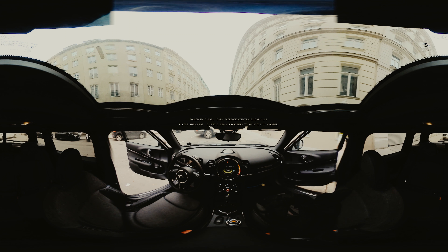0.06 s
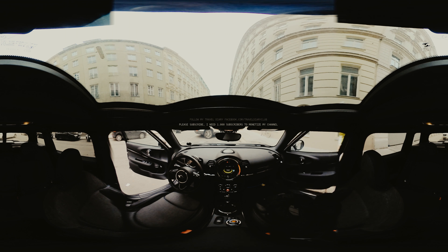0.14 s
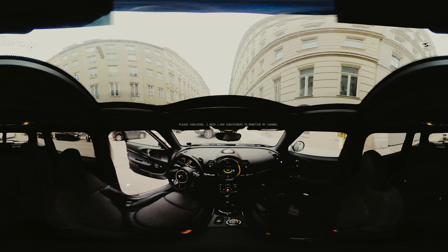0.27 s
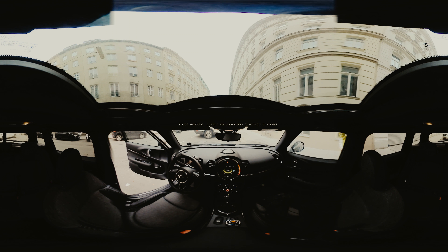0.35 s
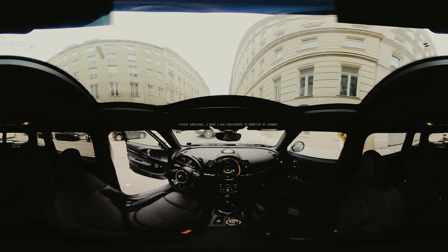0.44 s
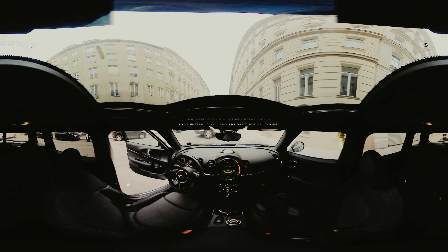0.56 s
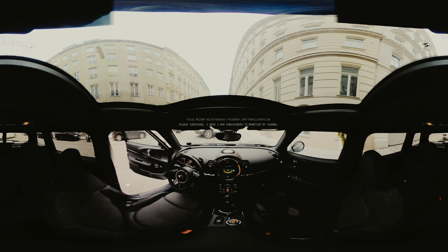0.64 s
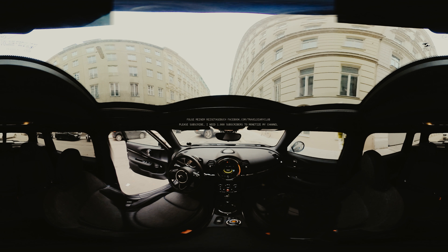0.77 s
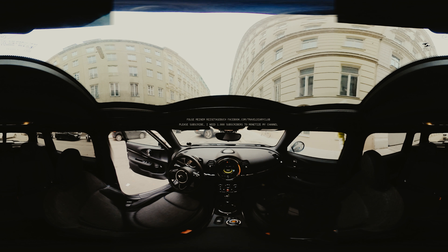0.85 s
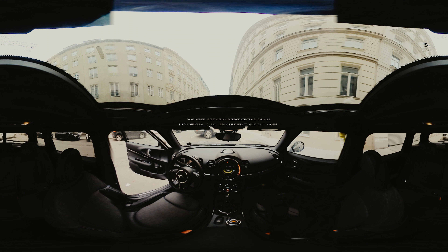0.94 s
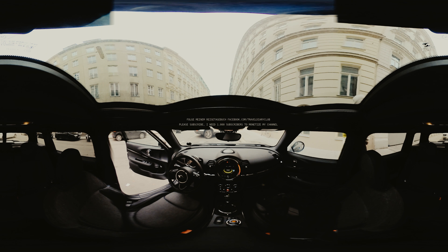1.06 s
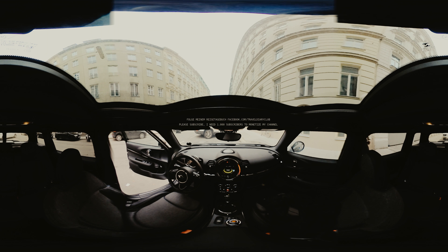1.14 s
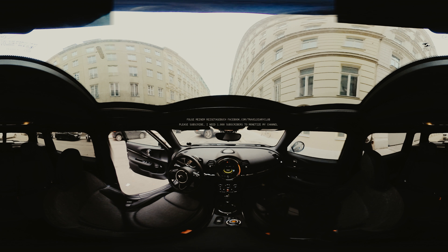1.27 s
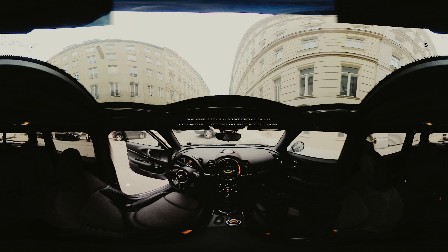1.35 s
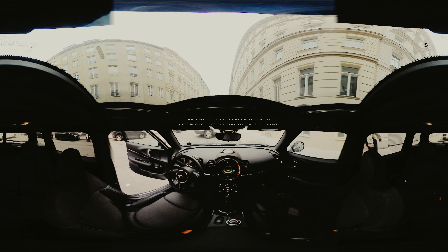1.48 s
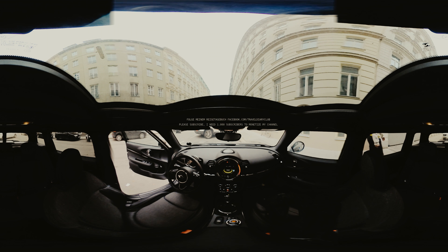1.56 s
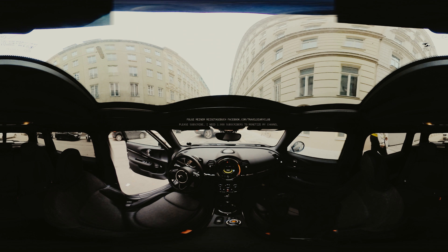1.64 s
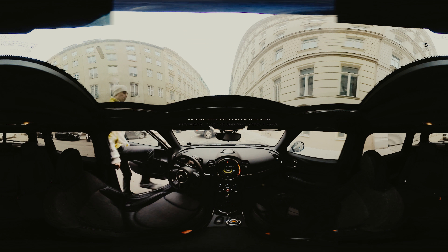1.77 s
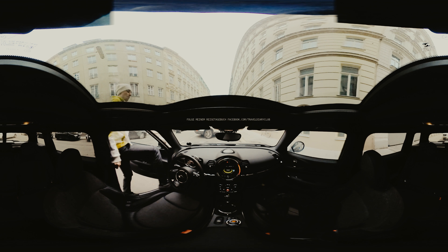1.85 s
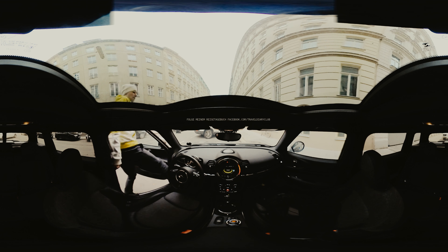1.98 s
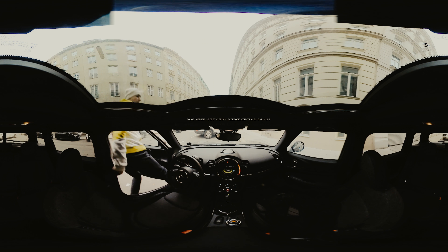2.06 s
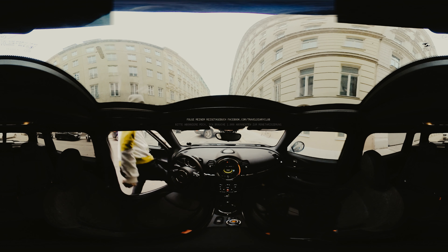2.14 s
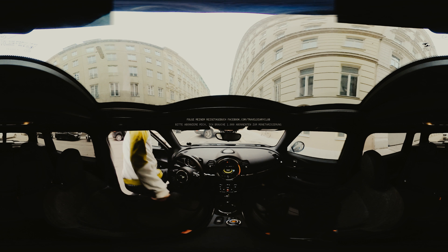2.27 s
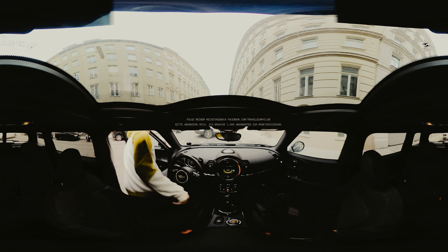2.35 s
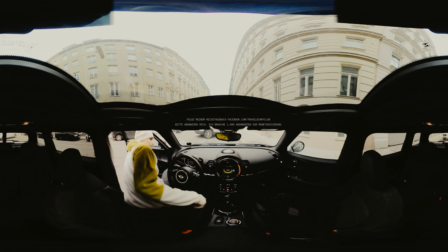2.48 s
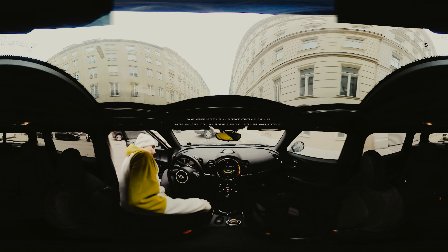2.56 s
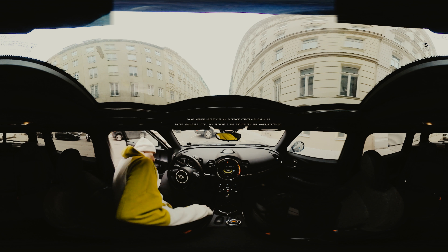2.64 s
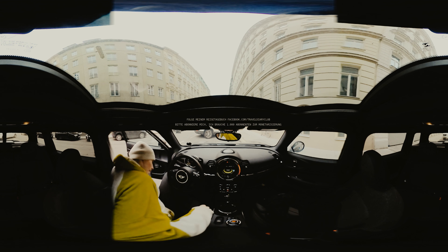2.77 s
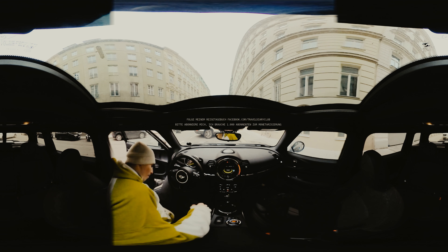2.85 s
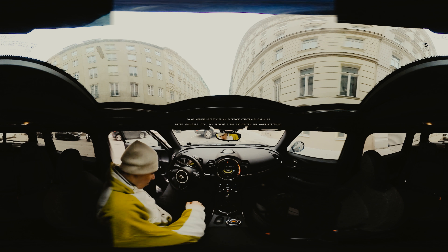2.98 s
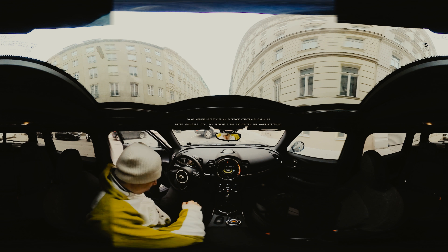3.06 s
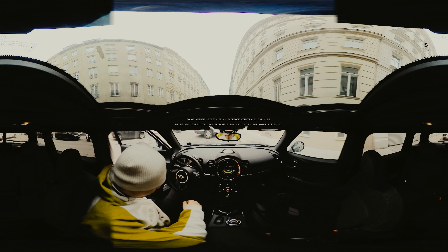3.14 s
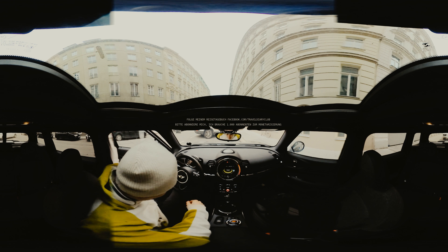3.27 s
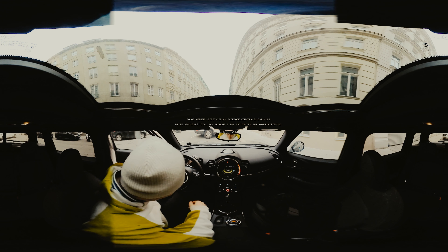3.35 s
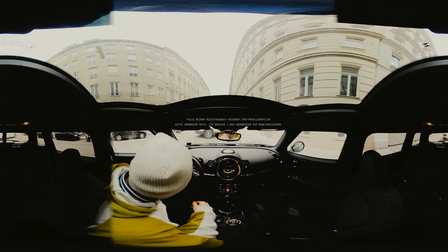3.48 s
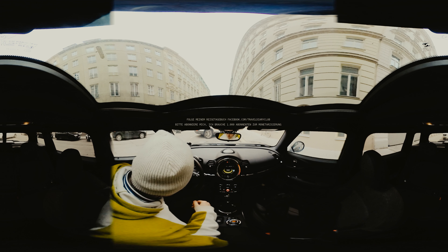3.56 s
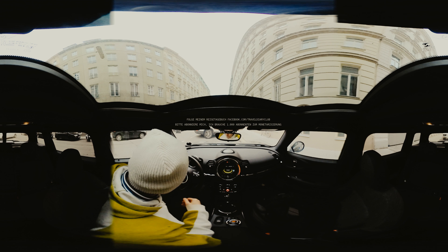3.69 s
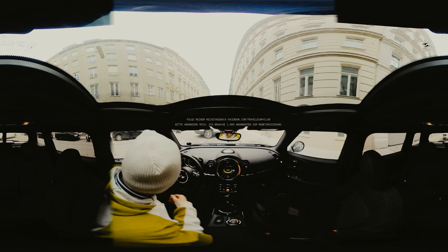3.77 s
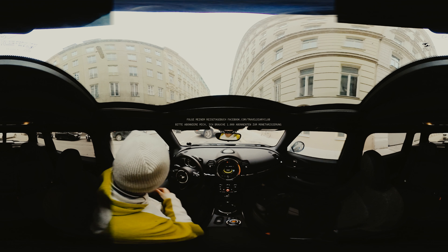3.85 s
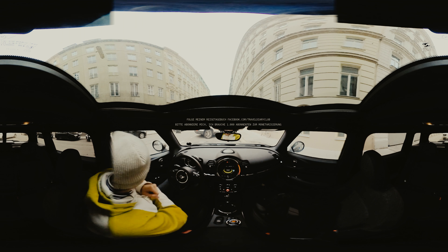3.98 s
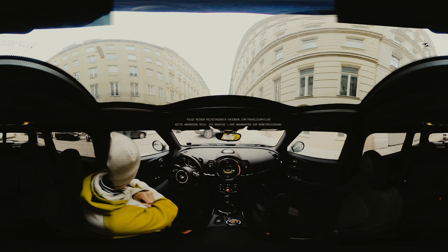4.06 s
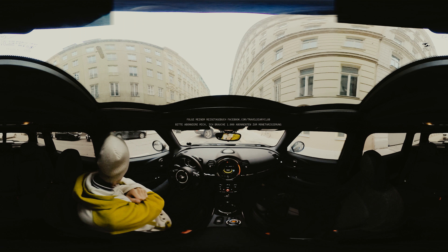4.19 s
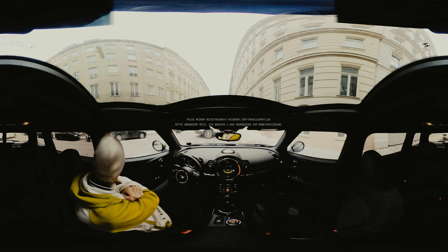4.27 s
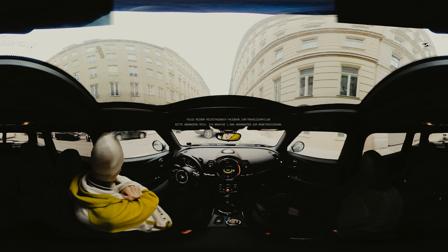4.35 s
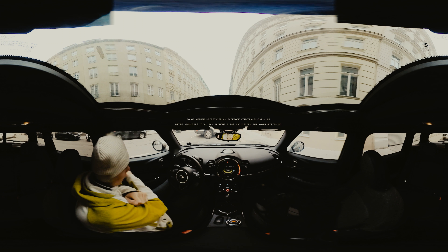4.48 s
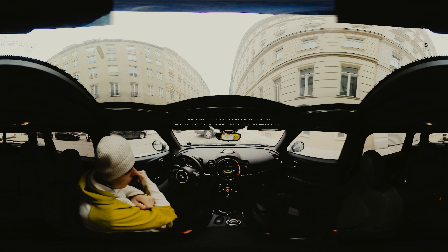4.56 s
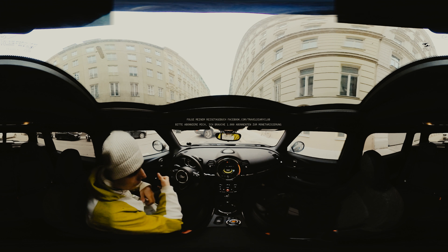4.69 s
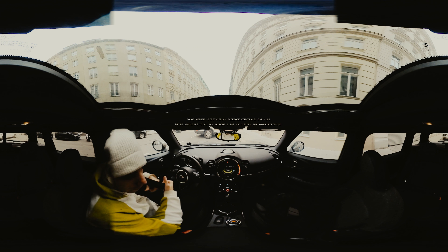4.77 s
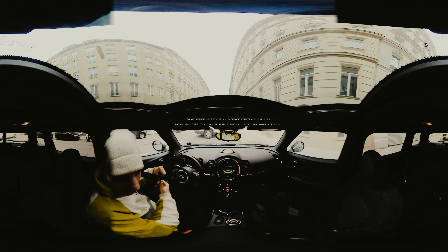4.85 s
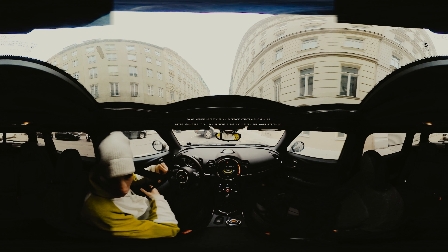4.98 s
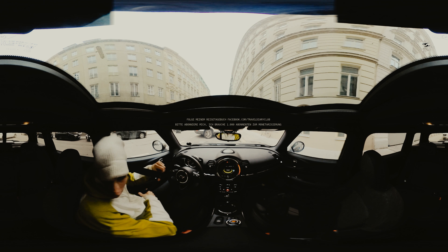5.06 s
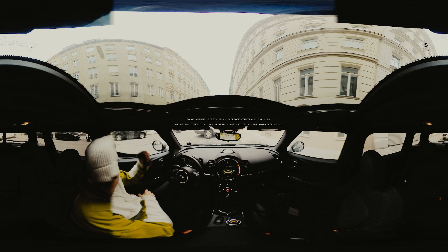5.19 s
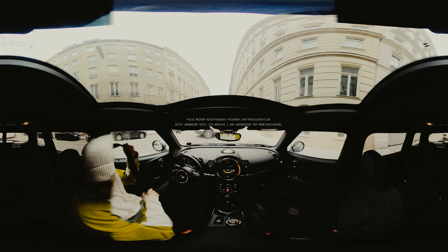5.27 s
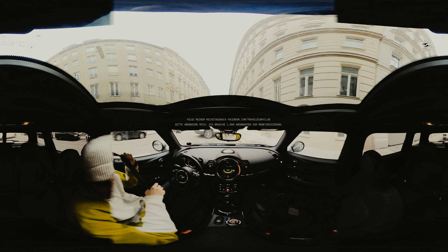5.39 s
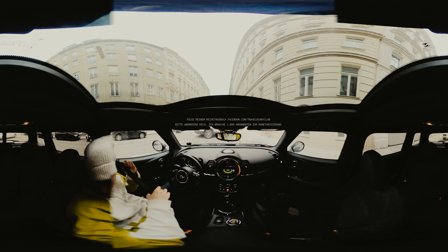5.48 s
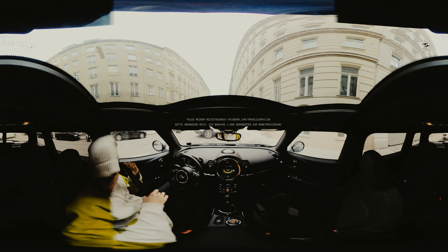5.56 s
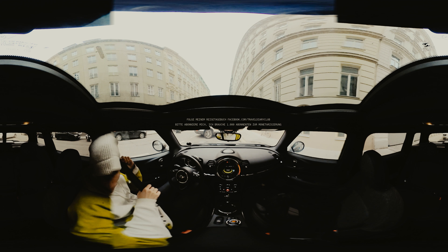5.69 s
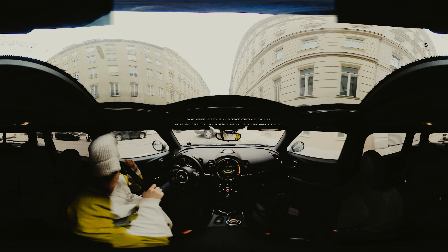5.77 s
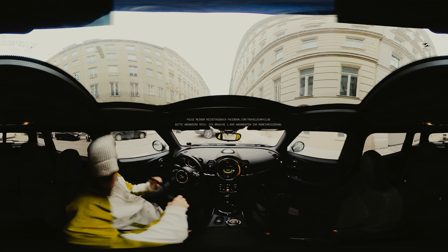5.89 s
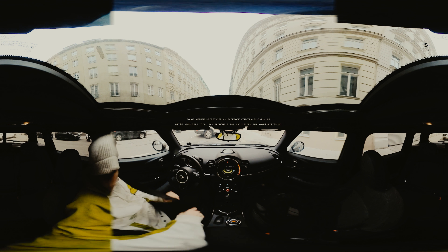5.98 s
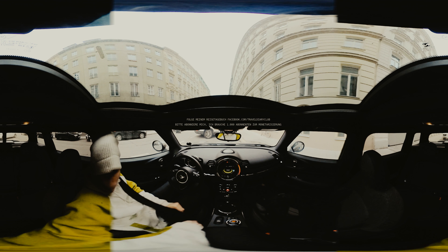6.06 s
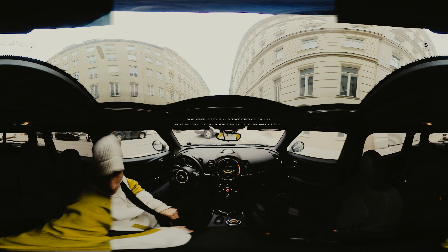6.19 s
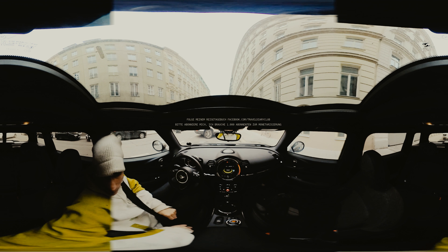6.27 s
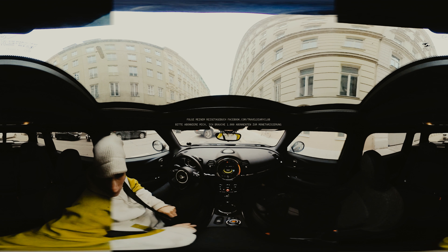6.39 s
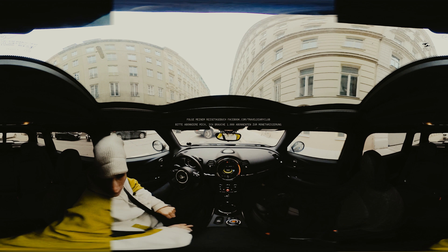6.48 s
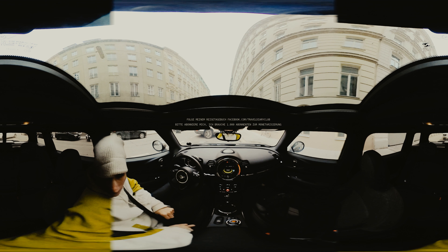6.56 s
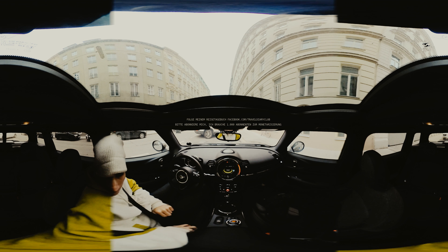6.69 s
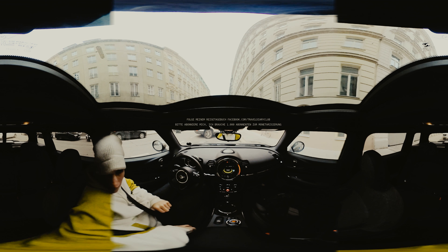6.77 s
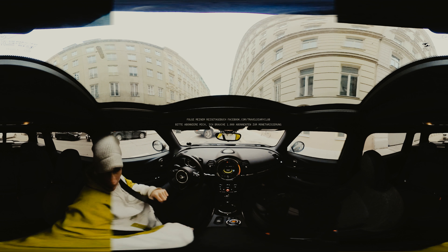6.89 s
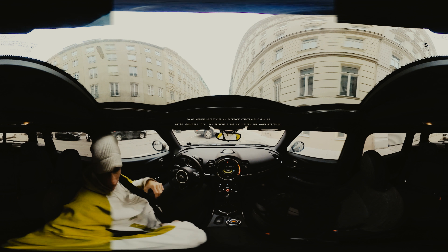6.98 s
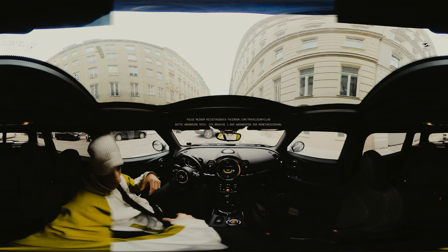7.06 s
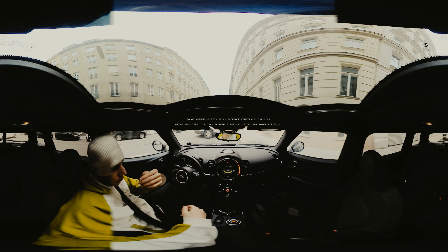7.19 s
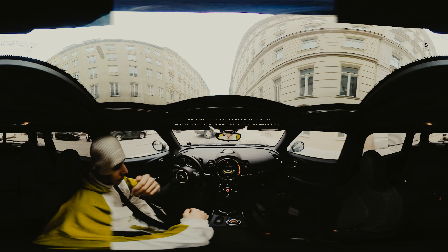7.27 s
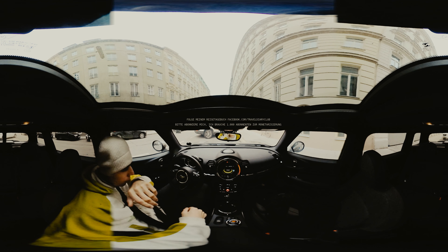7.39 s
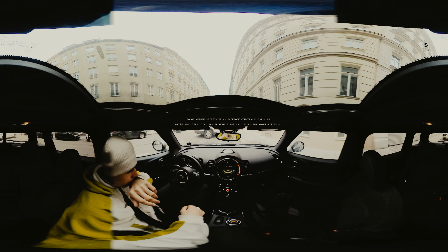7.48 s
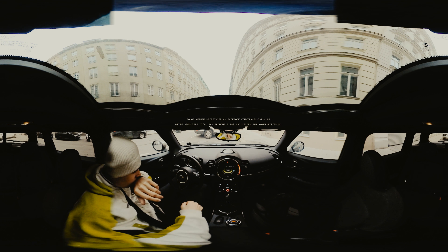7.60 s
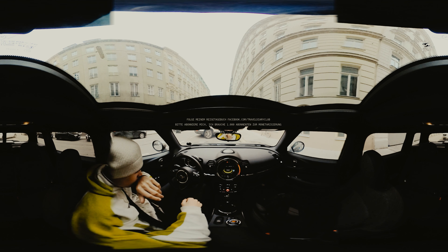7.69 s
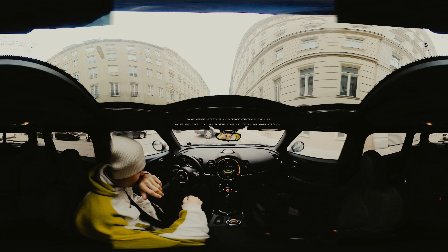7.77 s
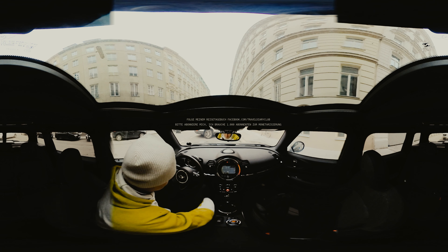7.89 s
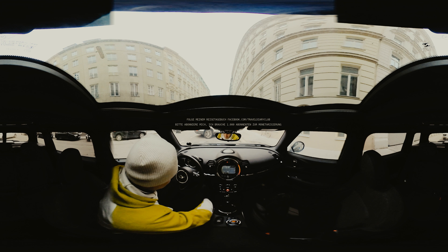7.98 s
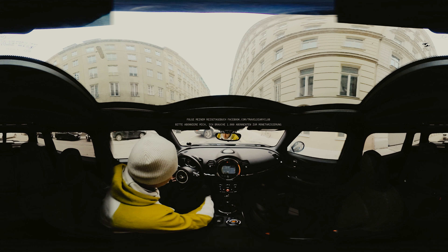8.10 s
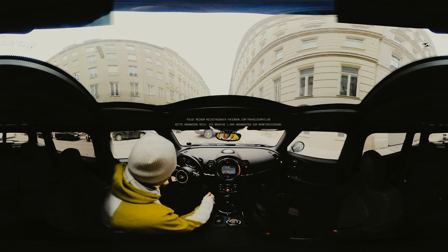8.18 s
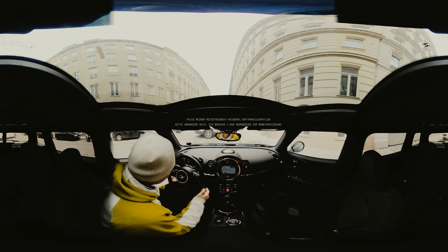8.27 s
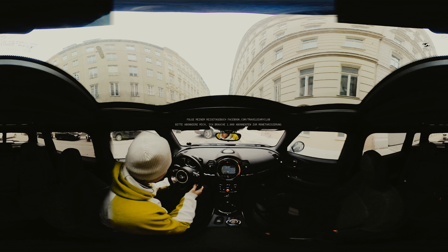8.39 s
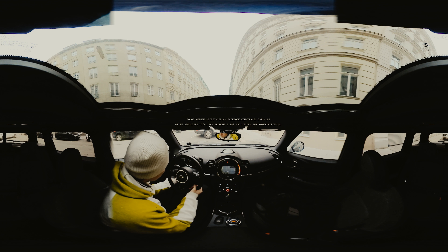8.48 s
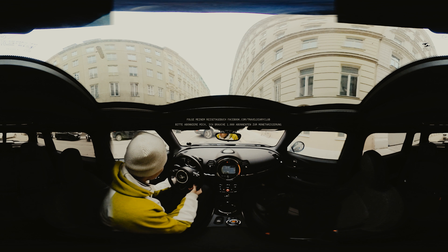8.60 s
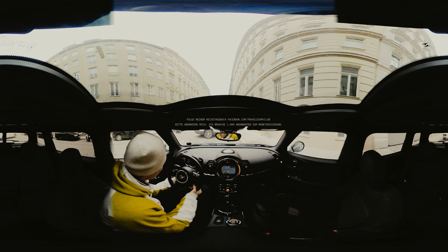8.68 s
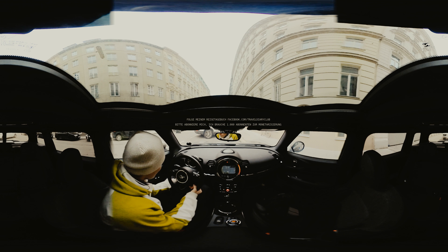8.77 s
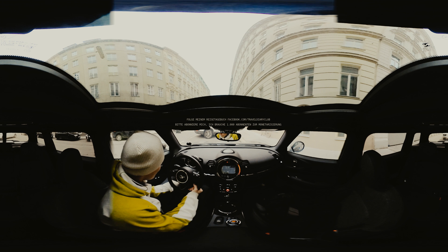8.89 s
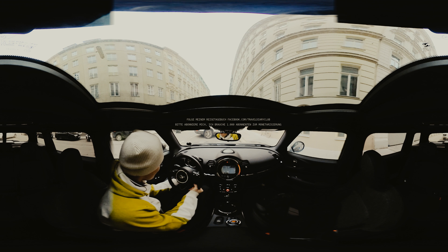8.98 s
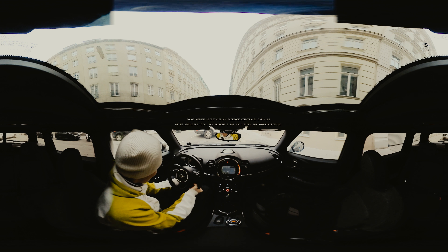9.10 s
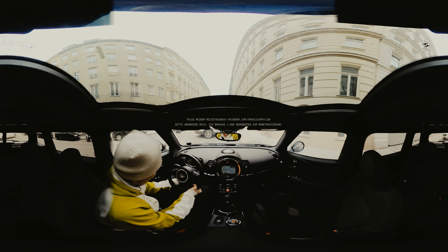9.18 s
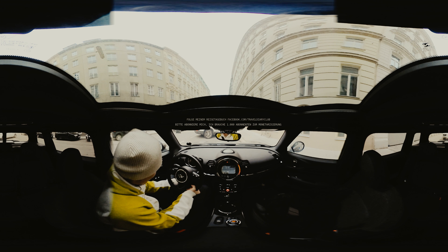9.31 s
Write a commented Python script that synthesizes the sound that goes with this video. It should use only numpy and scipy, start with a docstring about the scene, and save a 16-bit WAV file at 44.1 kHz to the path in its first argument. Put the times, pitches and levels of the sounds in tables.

```python
"""Two door slams, right near the start, left after the first scrape, knocks and rustling: a latch rattle,
a noisy panel burst and ringing cabin air. A driver climbs in on the left of the parked car and buckles up:
ringing clicks, grating metal, hollow plastic. Trim and seat knocks are noise-struck tones; cloth, cushion
and scrape are shaped noise; webbing whines in sines. The body rocks in deep noise over a dull street bed.
A mid-side microphone overloads on the slams."""
import sys
import numpy as np
from scipy import signal
from scipy.io import wavfile

SR = 44100
rng = np.random.default_rng(int(sys.argv[2]) if len(sys.argv) > 2 else 0)


def pcm_store(signal):
    """Save signal as 16-bit PCM."""
    levels = np.round(np.clip(np.atleast_2d(signal), -1, 1) * 32767)
    wavfile.write(sys.argv[1], SR, levels.astype(np.int16).T)


N = 411894  # samples

# Distant traffic spectrum: pitch_hz, relative level_db per Hz
STREET_SPECTRUM = [(40, -14), (250, -24), (800, -33), (2500, -43.5), (6000, -56), (16000, -58.5)]
STREET_DB = -65.5
# Stereo width of all banded noise: pitch_hz, left_right_likeness (-1 to 1)
STEREO_LIKENESS = [(25, -0.37), (1500, -0.099), (14000, -0.27)]

# Shifts of load that set the car body rocking: start_s (full level), held_s, level_db
BODY_JOLTS = [(.25, 0.095, -53.5), (.9, 0.23, -46), (2.3, 0.081, -50), (3.13, 0.054, -45.5),
              (3.45, 0.46, -53.5), (4.1, 0.027, -46), (5.0, 0.037, -51.5), (6.37, 0.5, -53),
              (7.2, 0.2, -60.5), (8.35, 0.38, -56.5), (9.1, 0.02, -53)]
ROCK_RISE_DB_PER_S, ROCK_FALL_DB_PER_S = 181, 27.5
# The deep noise leans on one cabin mode; the level is relative to that noise
ROCK_HZ, ROCK_T60_S, ROCK_RING_DB = 46.3, 0.37, 0.5

# People moving against cloth and seats: start_s (full level), held_s, cloth_db, cushion_db
BODY_MOVES = [(0.168, 0.0057, -71, -71), (1.879, 0.75, -67, -72.5), (2.68, 0.17, -64, -62),
              (2.82, 0.11, -62.5, -56.5), (3.132, 0.23, -60, -59), (3.45, .2, -63, -59.5),
              (3.82, .01, -82, -63.5), (4.03, 0.59, -76, -74), (4.695, 0.23, -63.5, -63.5),
              (5.06, 0.0065, -60.5, -69), (5.22, 0.47, -70, -81), (5.478, 0.25, -67, -67),
              (6.059, 0.17, -62.5, -67), (6.3, 0.23, -69.5, -71.5), (6.76, 0.59, -73.5, -63.5),
              (7.0, 0.19, -63, -70), (7.33, 0.2, -69.5, -65), (7.65, 0.24, -73, -76),
              (8.087, 0.053, -50.5, -57), (8.402, 0.045, -51, -61.5), (8.59, 0.16, -63, -95),
              (8.86, 0.0099, -65.5, -95), (9.03, 0.033, -60.5, -90), (9.15, 0.26, -72, -89)]
CLOTH_RISE_DB_PER_S, CLOTH_FALL_DB_PER_S = 195.5, 142.5
CUSHION_RISE_DB_PER_S, CUSHION_FALL_DB_PER_S = 133, 79
# Rustle spectrum: pitch_hz, relative level_db per Hz
CLOTH_SPECTRUM = [(500, -7.5), (1100, -6.5), (2100, 2.5), (4700, 6.5), (7000, -2), (11000, 7.5),
                  (16000, -20.5)]
CREASES_PER_S, CREASE_DB = 60, 5  # folds snapping out of the rustle: click rate, click gain
WEAVE_T60_S, WEAVE_DB = .025, -41  # faint resonances that colour the rustle: decay, middle gain

# Shoe over the sill: start_s (full level), held_s, level_db
SHOE_SCRAPE = (2.215, 0.099, -48.5)
SCRAPE_RISE_DB_PER_S, SCRAPE_FALL_DB_PER_S = 339, 507

# Pulls on the belt: fastest_s, top_ribs_per_s, start_s (full level), held_s, level_db, whole_pull_s
BELT_PULLS = [(4.862, 1060, 4.8, .12, -67.5, .21), (6.145, 1400, 6.03, .12, -64, .28)]
WHINE_RISE_DB_PER_S, WHINE_FALL_DB_PER_S = 500, 320

# Short dry snaps: door rebounds just after each slam, grit and plastic:
# start_s, peak_db before panning, pitch_hz (inside the band)
DRY_SNAPS = [(0.624, -38, 2500), (3.87, -33, 3000), (7.348, -49.5, 2850), (7.359, -51, 506),
             (7.766, -57, 889), (2.164, -35.5, 4000), (2.203, -41, 4060), (2.299, -30.5, 2130),
             (2.728, -47, 1300), (5.247, -48, 2550), (7.417, -47, 840)]
SNAP_T60_S = 0.043

# Hollow console beside the buckle: pitch_hz, level_db, t60_s
CONSOLE_MODES = [(284, 1, 0.16), (510, -1.5, 0.02), (590, 7, 0.032), (855, 4.5, 0.06)]
# Blows on it: start_s, strike_db before padding
CONSOLE_BLOWS = [(3.37, -41.5), (6.356, -31), (6.38, -25.5), (6.408, -34.5), (6.698, -42), (6.842, -43)]
# Belt dragged on the console: start_s (full drive), held_s, drive_db
BELT_CREAK = (6.976, 0.1, -57)
CREAK_RISE_DB_PER_S, CREAK_FALL_DB_PER_S = 1495, 500

# Tongue grating along its slot around the main clicks: start_s (full level), held_s, level_db
TONGUE_SLIDES = [(6.305, 0.075, -58.5), (6.648, .048, -46), (6.9, 0.033, -46)]
SLIDE_RISE_DB_PER_S, SLIDE_FALL_DB_PER_S = 621, 1498
# Modes of tongue and latch: pitch_hz, level_db, t60_s (at least 0.004 s is used)
BUCKLE_MODES = [(1330, 21.5, 0.015), (2210, 17.5, 0.0029), (3280, 10, 0.026), (5050, 12, 0.0043),
                (8640, 4.5, 0.011)]
# Buckle contacts: start_s, peak_db before panning
BUCKLE_CONTACTS = [(6.502, -39.5), (6.652, -21), (6.668, -32.5), (6.741, -43), (6.788, -41.5), (6.904, -17),
                   (7.062, -36.5)]

# Blows on trim, seat and floor: start_s, thud_peak_db, thud_hz, thud_t60_s, crack_peak_db (before panning)
TRIM_KNOCKS = [(0.169, -44, 126, 0.44, -50.5), (1.885, -46, 970, 0.17, -46.5), (1.963, -42, 238, 0.21, -58),
               (2.286, -35, 117, 0.087, -34), (2.398, -45, 212, 0.16, -76), (2.634, -44.5, 530, 0.23, -55),
               (2.684, -45.5, 284, 0.21, -46), (3.104, -31, 164, 0.36, -42.5),
               (3.446, -41, 66.4, 0.34, -55), (3.66, -51, 453, 0.037, -66), (4.259, -55, 970, 0.025, -49.5),
               (4.661, -36.5, 259, 0.045, -48.5), (4.773, -43, 503, 0.12, -49),
               (4.963, -42, 58.7, 0.3, -61), (5.012, -35.5, 137, 0.078, -84),
               (5.145, -41.5, 130, 0.056, -56), (5.204, -51, 890, 0.073, -41.5),
               (5.6, -28, 574, 0.19, -46.5), (5.638, -25, 271, 0.16, -41), (5.877, -44.5, 229, 0.16, -53.5),
               (6.348, -23.5, 485, 0.14, -23.5), (6.358, -33, 112, 0.36, -86), (8.61, -31.5, 82, 0.27, -45),
               (8.758, -45.5, 77, 0.11, -51), (8.843, -42, 80, 0.12, -53.5),
               (9.021, -52.5, 905, 0.47, -40.5), (9.052, -34, 340, 0.15, -84)]
# Knocks come from the right door, then from the driver's side; positive pan leans left
DRIVER_ARRIVES_S, RIGHT_DOOR_PAN_DB, DRIVER_PAN_DB = 1.5, -3, 6.5

# Right then left door: latch_s, panel_s, latch_peak_db, panel_peak_db (before panning), pan_db
DOOR_SLAMS = [(0.547, 0.558, -14.5, -7.5, -3), (3.834, 3.846, -16.5, -11.5, 2.5)]
# Cabin air and door skin: pitch_hz, t60_s, right_door_db, left_door_db
CABIN_MODES = [(23.15, 0.74, -8.5, -20.5), (30.4, 0.2, -3, 2), (45.4, 0.47, -27.5, -5.5),
               (80, 0.25, -17.5, -4.5), (118, 0.14, -0.5, -3), (181.9, 0.22, -14.5, -18.5),
               (315, 0.12, -18.5, -22), (406, 0.22, -31.5, -23)]
SIDE_LAG_S, SIDE_DB = .005, -9  # the air swings across the cabin too, a little later
# Panel noise: pitch_hz, relative level_db per Hz
SLAM_SPECTRUM = [(40, -4.5), (150, -13), (400, -18), (1300, -28), (4000, -48), (16000, -48)]
# Panel noise decay: pitch_hz, t60_s
SLAM_DECAY = [(40, 0.69), (200, 0.48), (1000, 0.18), (12000, 0.16)]

OVERLOAD = 0.22  # capsule swing where the bend sets in, full scale 1
CUTOFF_HZ = 16500  # from here up, at least 70 dB down


def from_db(db):
    """Turns decibels into gain."""
    return 10 ** (np.asarray(db) / 20)


def mid_rms_one(x):
    """Scales a stereo pair so that its mid has rms 1."""
    return x / np.sqrt(np.mean(x.mean(axis=0) ** 2))


def peak(sound, db):
    """Sets the peak of the mid."""
    return from_db(db) * sound / np.abs(sound.mean(axis=0)).max()


def pan(db):
    """Left and right gains, leaning left when positive."""
    return from_db(np.array([db / 2, -db / 2])).reshape(2, -1)


def add(out, s, sound):
    """Mixes a sound in at time s."""
    at = round(s * SR)
    out[:, at:at + sound.shape[1]] += sound[:, :N - at]


def at_hz(points, hz):
    """Reads a spectrum on a log-frequency axis."""
    points = np.array(points)
    return np.interp(np.log(hz), np.log(points[:, 0]), points[:, 1])


def drift(rate_hz):
    """Slow random wander of spread 1: noise smoothed by two equal poles, made at every 40th sample."""
    r = np.exp(-80 * np.pi * rate_hz / SR)
    slow = signal.lfilter([1], [1, -2 * r, r * r], rng.standard_normal(N // 40 + 2002))[2000:]
    return np.interp(np.arange(N) / 40, np.arange(len(slow)), slow / slow.std())


def dying(size, t60, rise):
    """Envelope that rises quickly and dies exponentially."""
    t = np.arange(size) / SR
    return (1 - np.exp(-t / max(rise, 1e-4))) * from_db(-60 * t / max(t60, .004))


def swells(rows, rise_db_per_s, fall_db_per_s):
    """Gain of events (start_s, held_s, level_db) that rise, hold and fall steadily in dB; powers add."""
    t = np.arange(0, N + 40, 40) / SR
    power = 0
    for s, held, db in rows:
        before = rise_db_per_s * np.maximum(s - t, 0)
        after = fall_db_per_s * np.maximum(t - s - abs(held), 0)
        power = power + from_db(2 * (db - before - after))
    return np.interp(np.arange(N) / SR, t, np.sqrt(power))


def ring(x, hz, t60):
    """Two-pole resonance: a unit click sets a decaying sine of starting height 1 ringing."""
    r, w = from_db(-60 / (max(t60, .004) * SR)), 2 * np.pi * hz / SR
    return signal.lfilter([0, np.sin(w)], [1, -2 * r * np.cos(w), r * r], x + 1e-18)


def band(x, low_hz, high_hz, order=2):
    """Band-pass."""
    return signal.sosfilt(signal.butter(order, [low_hz, high_hz], "band", fs=SR, output="sos"), x)


def bands(spectrum, excite):
    """Half-octave stereo bands cut from two noise pairs in turn: yields (hz, left and right)."""
    edges = 40 * 2 ** np.arange(0, 9, .5)
    for k, (low, high) in enumerate(zip(edges, np.minimum(edges[1:], 19000))):
        mid, side = band(excite[k % 2], low, high)
        hz = np.sqrt(low * high)
        alike = np.clip(at_hz(STEREO_LIKENESS, hz), -.95, .95)
        pair = np.sqrt(1 + alike) * mid + np.sqrt(1 - alike) * side * [[1], [-1]]
        yield hz, from_db(at_hz(spectrum, hz)) * pair


def grains(spread_db):
    """Dense stereo noise with some samples standing out."""
    lift_db = spread_db * np.minimum(rng.exponential(1, (2, 2, N)), 5)
    return from_db(lift_db) * rng.standard_normal((2, 2, N))


def street():
    """Distant traffic: smooth, dull noise whose level wanders slightly."""
    hum = sum(layer for hz, layer in bands(STREET_SPECTRUM, rng.standard_normal((2, 2, N))))
    return from_db(STREET_DB + 0.82 * drift(0.95)) * mid_rms_one(hum) * pan(3.4)


def rocking():
    """Lumpy deep noise of the sprung body and the cabin air, one cabin mode ringing along."""
    mid, side = band(rng.standard_normal((2, N)), 17, 66.3, order=3)
    rumble = mid_rms_one(mid + 1.3 * side * [[1], [-1]])
    mode = mid_rms_one(ring(rumble, ROCK_HZ, ROCK_T60_S))
    rumble = mid_rms_one(rumble + from_db(ROCK_RING_DB) * mode)
    lumps = from_db(1.5 * drift(6))
    return rumble * lumps * swells(BODY_JOLTS, ROCK_RISE_DB_PER_S, ROCK_FALL_DB_PER_S)


def cushion():
    """Foam and seat cover give a dull, lumpy rub under the moving body."""
    lumps = from_db(2.0 * drift(25))
    rub = band(rng.standard_normal((2, N)), 110, 796, order=1) * lumps
    moves = [(s, held, db) for s, held, _, db in BODY_MOVES]
    return mid_rms_one(rub) * swells(moves, CUSHION_RISE_DB_PER_S, CUSHION_FALL_DB_PER_S) * pan(5.6)


def creases():
    """Folds snap: sparse uneven clicks, each dealt to a short resonance between 600 Hz and 4 kHz."""
    clicks = (rng.random(N) < CREASES_PER_S / SR) * rng.standard_normal((2, N))
    dealt = rng.integers(0, 8, N)
    pitches = np.geomspace(600, 4000, 8)
    snapped = sum(ring(clicks * (dealt == k), hz, 9 / hz) for k, hz in enumerate(pitches))
    return from_db(CREASE_DB) * snapped


def rustle():
    """Fibres slip in dense grains, all bands swelling partly together, with weave resonances and creases."""
    together = .8 * drift(30)
    layers = bands(CLOTH_SPECTRUM, grains(3))
    cloth = sum(layer * from_db(together + 1.6 * drift(10)) for hz, layer in layers)
    # 20 resonances between 800 and 5600 Hz flare up and fade
    weave_hz = 800 * 7 ** rng.random(20)
    cloth += sum(from_db(WEAVE_DB + 5 * drift(7)) * ring(cloth, hz, WEAVE_T60_S) for hz in weave_hz)
    moves = swells([row[:3] for row in BODY_MOVES], CLOTH_RISE_DB_PER_S, CLOTH_FALL_DB_PER_S)
    return (mid_rms_one(cloth) + creases()) * moves * pan(2.0)


def scrape():
    """Grit under the sole: coarse grains in the upper middle."""
    grit = band(grains(6.8)[0], 1270, 3500, order=1)
    return mid_rms_one(grit) * swells([SHOE_SCRAPE], SCRAPE_RISE_DB_PER_S, SCRAPE_FALL_DB_PER_S) * pan(3.8)


def webbing():
    """The ribs of the weave whine unevenly at the speed of the pull, with an octave above and below."""
    out, t = np.zeros(N), np.arange(N) / SR
    for fastest_s, top_hz, from_s, for_s, db, pull_s in BELT_PULLS:
        # the speed arches like half an ellipse
        speed = np.sqrt(np.maximum(1 - (2 * (t - fastest_s) / pull_s) ** 2, 0))
        turn = 2 * np.pi * np.cumsum(top_hz * speed * (1 + .02 * drift(150))) / SR
        tone = np.sin(turn) + from_db(-10) * np.sin(2 * turn) + from_db(-10) * np.sin(turn / 2)
        swell = swells([(from_s, for_s, db)], WHINE_RISE_DB_PER_S, WHINE_FALL_DB_PER_S)
        out += np.sqrt(2) * tone * from_db(3.2 * drift(40)) * swell
    return out * pan(4.0)


def snaps():
    """Door rebounds, grit and plastic snap: quickly dying noise bursts, an octave or so wide."""
    out, size = np.zeros((2, N)), SR // 10
    for (s, db, hz), white in zip(DRY_SNAPS, rng.standard_normal((len(DRY_SNAPS), 2, size))):
        burst = white * dying(size, SNAP_T60_S, rise=0.00043)
        add(out, s, peak(band(burst, hz / 1.64, hz * 1.29), db))
    return out * pan(5.6)


def console():
    """Padded blows and the uneven slips of a creak excite the same hollow plastic."""
    blows = np.zeros((2, N))
    for s, db in CONSOLE_BLOWS:
        add(blows, s, from_db(db) * np.array([[1.3], [.7]]))
    padded = band(blows, 180, 400)
    slips = (rng.random(N) < 6000 / SR) * rng.standard_normal(N)  # about 6000 a second
    slips = slips * swells([BELT_CREAK], CREAK_RISE_DB_PER_S, CREAK_FALL_DB_PER_S)
    slips = signal.lfilter([.3], [1, -.62], slips)  # softened
    hollow = sum(from_db(db) * ring(padded + slips, hz, t60) for hz, db, t60 in CONSOLE_MODES)
    return hollow + 2.8 * band(slips, 260, 1700, order=1)


def sliding():
    """Grainy metal-on-metal noise, partly through the modes of the buckle."""
    grit = grains(3.9)[0]
    metal = sum(from_db(db) * ring(grit, hz, t60) for hz, db, t60 in BUCKLE_MODES)
    rasp = mid_rms_one(band(grit, 270, 4800, order=1)) + 0.25 * mid_rms_one(metal)
    return mid_rms_one(rasp) * swells(TONGUE_SLIDES, SLIDE_RISE_DB_PER_S, SLIDE_FALL_DB_PER_S)


def buckle():
    """Each contact chatters for some milliseconds into the modes of tongue and latch, amid its own clatter."""
    out, size = np.zeros((2, N)), SR // 5
    noises = rng.standard_normal((len(BUCKLE_CONTACTS), 2, 2, size))
    for (s, db), white in zip(BUCKLE_CONTACTS, noises):
        chatter = white[0] * dying(size, .07, rise=.002)
        metal = sum(from_db(level_db) * ring(chatter, hz, t60) for hz, level_db, t60 in BUCKLE_MODES)
        clatter = band(white[1], 400, 9000, order=1) * dying(size, .08, rise=.0025)
        add(out, s, peak(peak(metal, 0) + peak(clatter, -1.5), db))
    return out * pan(0.51)


def knocks():
    """The struck part rings briefly amid a dull noisy thud; the contact itself cracks."""
    out, size = np.zeros((2, N)), SR // 3
    noises = rng.standard_normal((len(TRIM_KNOCKS), 2, size))
    for (s, thud_db, hz, t60, crack_db), white in zip(TRIM_KNOCKS, noises):
        # the resonance's t60 is 14 cycles at most
        tone = ring(white * dying(size, t60 / 2, rise=.002), hz, min(t60, 14 / hz))
        dull = band(white[::-1], hz / 2, 2.2 * hz, order=3) * dying(size, t60, rise=.003)
        thud = peak(tone, 0) + peak(dull, -8)
        crack = band(white, 870, 2950, order=1) * dying(size, 0.098, rise=0.00058)
        pan_db = RIGHT_DOOR_PAN_DB if s < DRIVER_ARRIVES_S else DRIVER_PAN_DB
        add(out, s, (peak(thud, thud_db) + peak(crack, crack_db)) * pan(pan_db))
    return out


def doors():
    """The latch rattles, then the panel pumps the cabin air and every band of the body dies away."""
    out, size = np.zeros((2, N)), SR
    for door, (latch_s, panel_s, latch_db, panel_db, pan_db) in enumerate(DOOR_SLAMS):
        white = rng.standard_normal((2, 2, size))
        # a fast decay over a faint longer tail
        fade = dying(size, .16, rise=.008) ** 2 + from_db(-30) * dying(size, .5, rise=.008)
        rattle = band(white[0] * np.abs(white[1]), 450, 3600, order=3) * fade
        add(out, latch_s, peak(rattle, latch_db) * pan(pan_db))

        layers = bands(SLAM_SPECTRUM, white)
        body = sum(layer * dying(size, at_hz(SLAM_DECAY, hz), rise=.004) for hz, layer in layers)
        body *= from_db(2.5 * drift(120)[:size])  # loose trim rattles unevenly
        add(out, panel_s, peak(body, panel_db) * pan(pan_db))

        push = signal.unit_impulse(size)
        air = sum(from_db(row[2 + door]) * ring(push, row[0], row[1]) for row in CABIN_MODES)
        across = from_db(SIDE_DB) * np.roll(air, round(SIDE_LAG_S * SR))
        add(out, panel_s, air + across * [[-1], [1]])
    return out


def scene():
    """All sources, left and right, from the background forward."""
    background = street() + rocking()
    movement = cushion() + rustle() + scrape() + webbing()
    contacts = snaps() + console() + sliding() + buckle() + knocks()
    return background + movement + contacts + doors()


def record(dry):
    """The long slow swings of the mid and side capsules hit their stops, treble rides on; the top is cut."""
    capsules = np.array([dry[0] + dry[1], dry[0] - dry[1]]) / 2
    slow = signal.sosfilt(signal.butter(1, 4000, fs=SR, output="sos"), capsules)
    treble = capsules - slow
    mid, side = slow / (1 + (np.abs(slow) / OVERLOAD) ** 6.9) ** (1 / 6.53) + treble
    top_cut = signal.cheby2(14, 70, CUTOFF_HZ, fs=SR, output="sos")
    return signal.sosfilt(top_cut, [mid + side, mid - side])


dry = scene()
out = record(dry)
pcm_store(out)
```